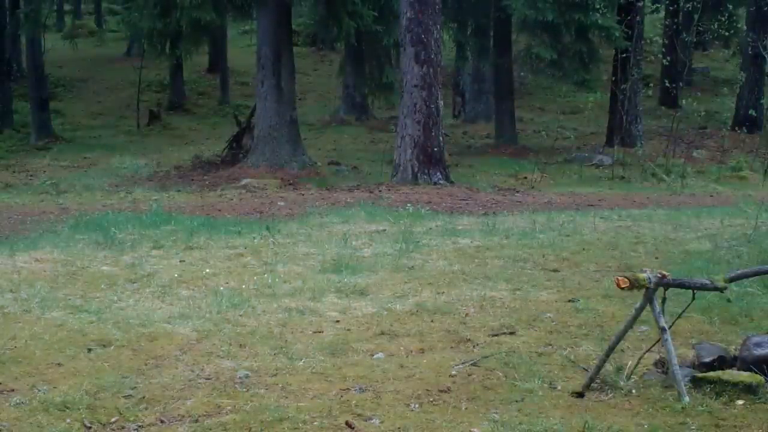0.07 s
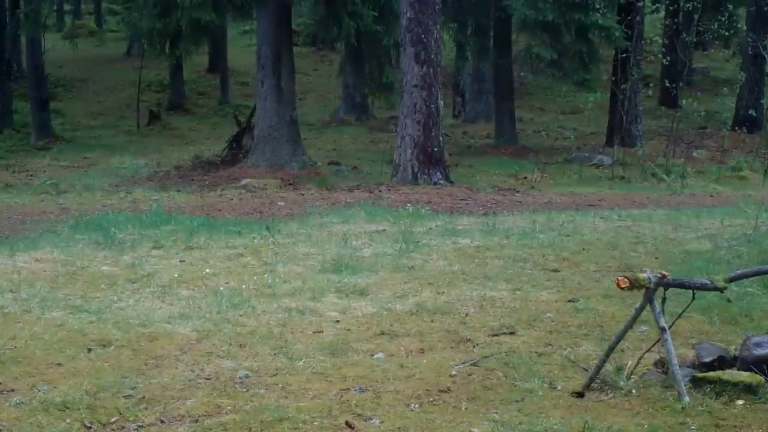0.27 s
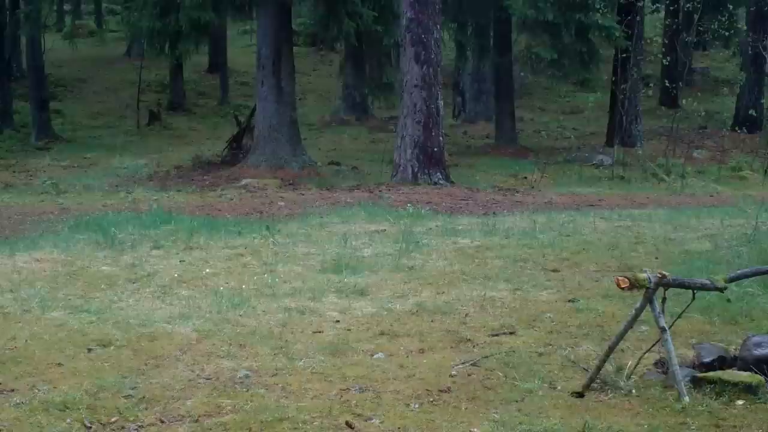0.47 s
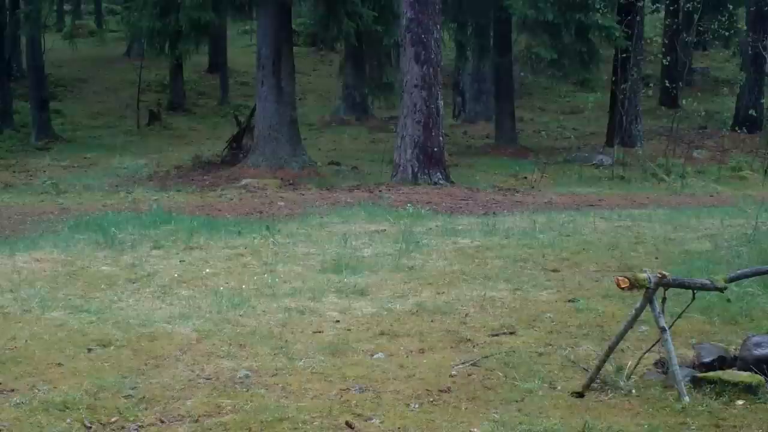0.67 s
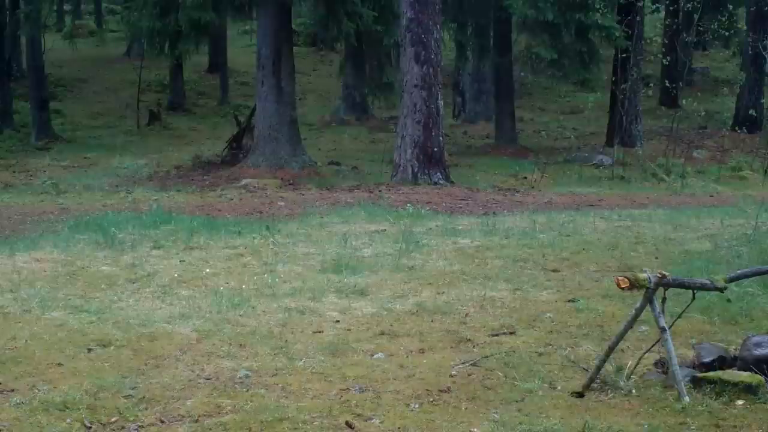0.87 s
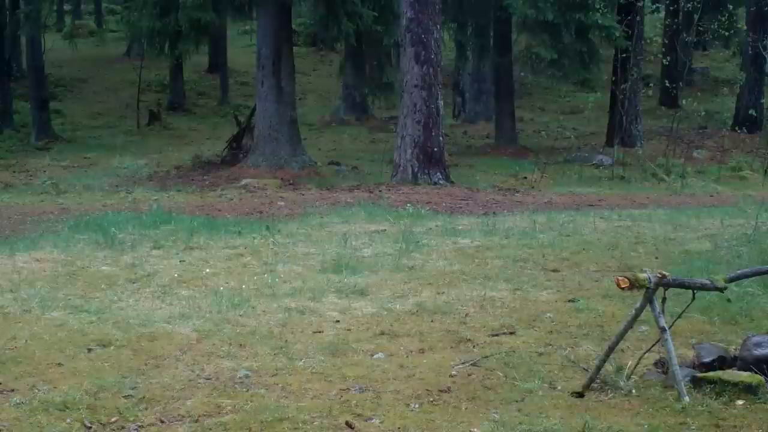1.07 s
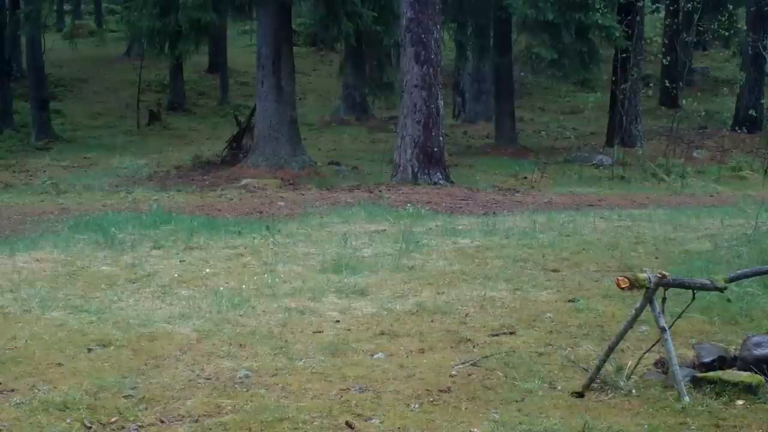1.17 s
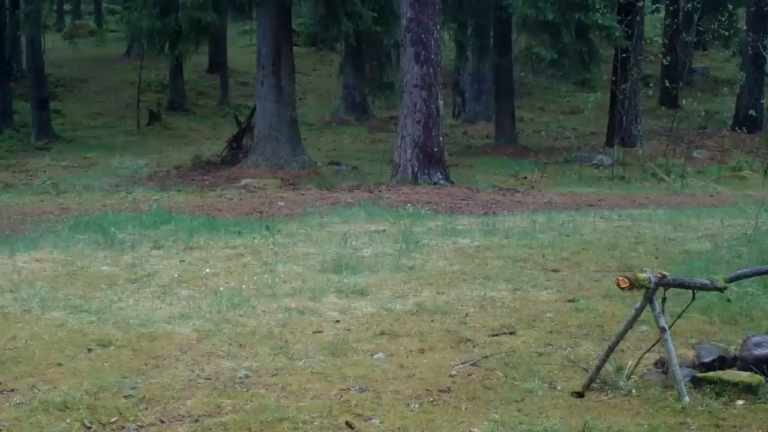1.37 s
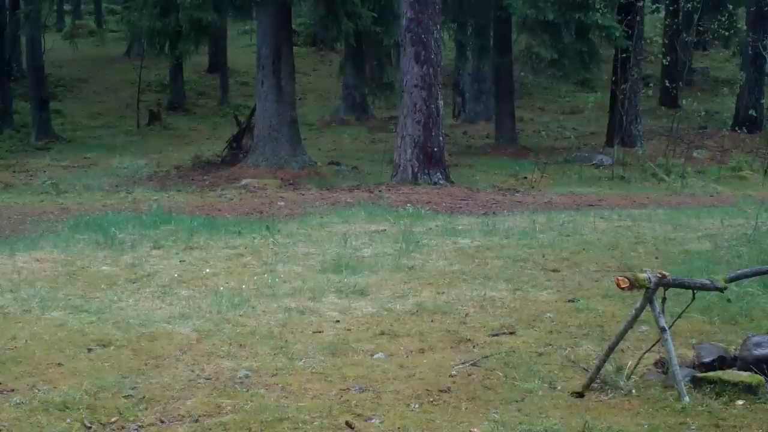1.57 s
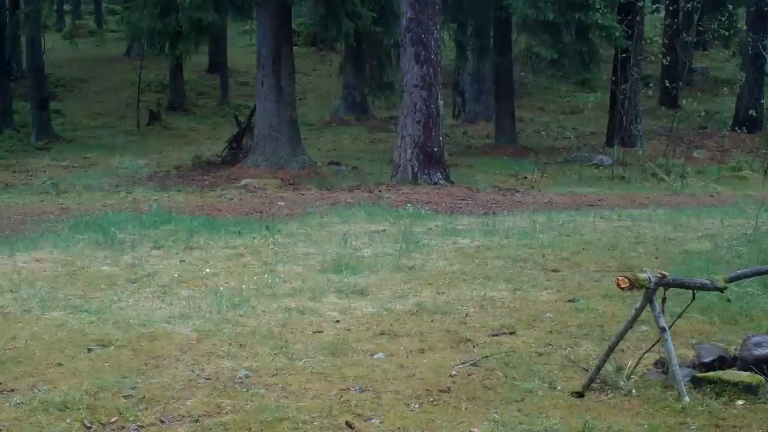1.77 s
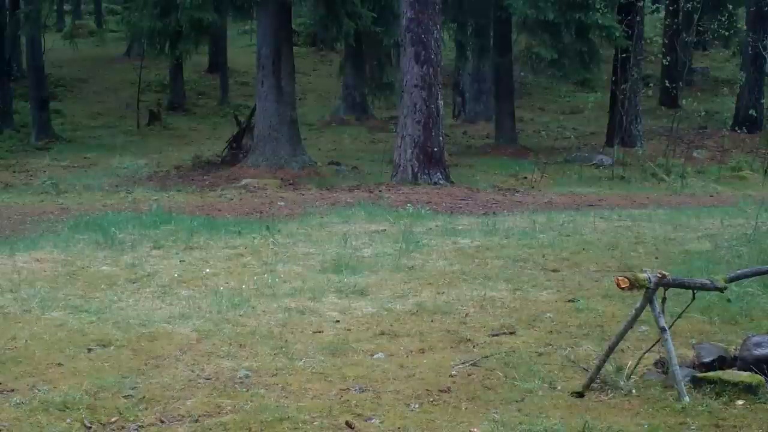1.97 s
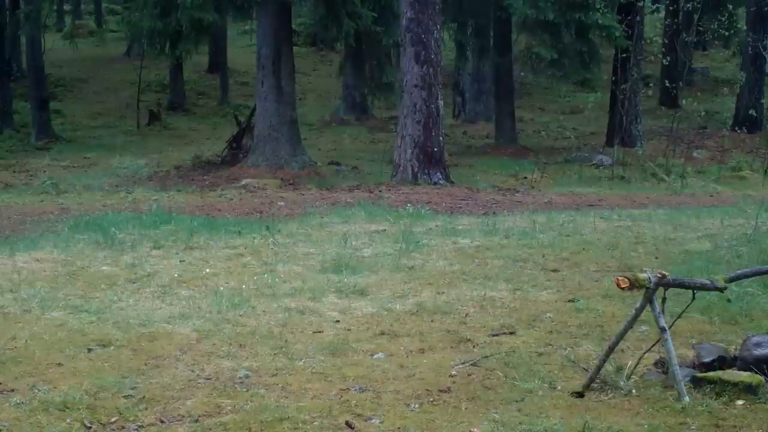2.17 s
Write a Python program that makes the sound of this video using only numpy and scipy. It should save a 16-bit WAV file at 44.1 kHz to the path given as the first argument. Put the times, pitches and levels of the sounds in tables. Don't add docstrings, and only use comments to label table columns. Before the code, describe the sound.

In a quiet forest clearing, arrows rattle and scrape into a leather tube in one dense burst, then shafts click against each other in small flurries; close, bright, slightly ringing small-microphone sound.

```python
import sys
import numpy as np
from scipy import signal
from scipy.fft import rfft, irfft
from scipy.io import wavfile
from scipy.ndimage import uniform_filter1d

SR = 44100
rng = np.random.default_rng(int(sys.argv[2]) if len(sys.argv) > 2 else 0)


def int16_out(signal):
    q = np.round(np.clip(np.atleast_2d(signal).T, -1, 1) * 32767)
    wavfile.write(sys.argv[1], SR, q.astype(np.int16))


def boost(x):
    u = np.asarray(x, float) / 20
    return 10 ** u


N = 97020

# frequency in Hz, level in dB, fade t60 in seconds.
SHAFT_MODES = [(1030, 1.5, 0.0054), (1495, -4.5, 0.0081), (1795, -5, 0.022), (2280, -4, 0.017),
               (2550, -14.5, 0.045), (3445, -13.5, 0.012), (4260, -26, 0.0059)]
# frequency in Hz, level in dB, fade t60 in seconds.
TUBE_MODES = [(131, -16, 0.046), (239.7, -8, 0.14), (370, 2.5, 0.048), (621, -1, 0.05), (832, -6, 0.052),
              (998, -11.5, 0.057), (1250, -6.5, 0.022)]
# start in seconds, level in dB, push in ms, frequency of the dent in Hz.
TUBE_BLOWS = [(0.009, -43, 0.71, 102), (0.035, -40.5, 0.56, 403), (0.058, -40.5, 0.77, 276),
              (0.089, -47, 0.97, 407), (0.149, -44, 0.49, 102), (0.275, -24, 1.06, 154),
              (0.29, -22.5, 1.24, 626), (0.313, -28.5, 0.53, 385), (0.321, -27.5, 0.26, 390),
              (0.334, -25, 0.68, 136), (0.349, -33, 1.4, 353), (0.362, -42, 0.61, 143),
              (0.383, -29, 1.1, 293), (0.391, -31.5, 1.4, 245), (0.427, -37, 0.83, 283),
              (0.451, -34, 0.66, 152), (0.477, -41, 0.86, 190), (0.524, -34.5, 0.7, 720),
              (0.552, -39, 0.63, 103), (0.613, -44.5, 0.36, 660), (1.546, -46, 1, 675)]
TAP_DB = -24.5


def filtered(x, order, hz, kind="low"):
    return signal.lfilter(*signal.butter(order, hz, kind, fs=SR), x)


def ring(x, modes):
    out = 0
    for hz, db, t60 in modes:
        radius = np.exp(-np.log(1000) / (t60 * SR))
        angle = 2 * np.pi * hz / SR
        poles = [1, -2 * radius * np.cos(angle), radius * radius]
        out = out + boost(db) * signal.lfilter([0, radius * np.sin(angle)], poles, x)
    return out


def grit(scatter_db):
    sizes = np.repeat(rng.exponential(size=N // 3 + 1), 3)[:N].clip(0, 4)
    x = rng.standard_normal(N) * boost(scatter_db * sizes)
    return x / x.std()


def walk(rate):
    k = int(SR / rate)
    x = uniform_filter1d(uniform_filter1d(rng.standard_normal(N), k), k)
    return x / x.std()


def drift(spectrum, db, rate):
    octave = np.log2(np.maximum(np.arange(N // 2 + 1) * SR / N, 10))
    out = 0
    for centre in np.arange(int(octave[0]), octave[-1] + 1):
        band = np.clip(1 - abs(octave - centre), 0, 1)
        out = out + irfft(spectrum * band, N) * boost(db * walk(rate))
    return out


def showers(table, db):
    scatter_db, patchy_db, tick_db = 2.5, 0.56, 0
    hold = 1.447
    tail_db, tail_stretch, tail_band_hz = -18.5, 3.05, [3500, 8700]
    t = np.arange(N) / SR
    air, tail, wood, ticks = np.zeros((4, N))
    for start, peak_db, t60, ring_db in table:
        age = np.maximum(t - start, 0) / max(t60, .002)
        gain = (t >= start) * boost(peak_db + db)
        air += gain * boost(-60 * age ** hold)
        tail += gain * boost(tail_db - 60 * age / tail_stretch)
        wood += gain * boost(ring_db - 60 * age)
        ticks[int(start * SR) + 16] = boost(tick_db)
    impacts = drift(rfft(grit(scatter_db)), patchy_db, 210) + ticks
    dull = filtered(grit(scatter_db), 2, tail_band_hz, "band")
    return impacts * air + dull * tail + 0.15 * ring(impacts * wood, SHAFT_MODES)


def forest():
    # frequency in Hz, level in dB per Hz.
    hush_spectrum = [(25, -62), (60, -71), (170, -85), (500, -87.5), (1200, -93), (2500, -104),
                     (7000, -112), (16000, -112)]
    points_hz, points_db = np.array(hush_spectrum).T
    log_hz = np.log(np.maximum(np.arange(N // 2 + 1) * SR / N, 10))
    colour = boost(np.interp(log_hz, np.log(points_hz), points_db)) * np.sqrt(SR / 2)
    hush = drift(rfft(rng.standard_normal(N)) * colour, 0.18, 16)
    return filtered(hush, 2, 22, "high")


def rub():
    # time in seconds, level in dB.
    strokes = [(0, -43), (0.099, -57), (.19, -46), (.235, -44), (.27, -34), (.3, -41), (.45, -31),
               (.53, -55), (.6, -70), (.7, -48), (.9, -62), (1.0, -43), (1.2, -90), (1.35, -71), (1.5, -74),
               (1.62, -41), (1.75, -69), (2.2, -64)]
    times, levels_db = np.array(strokes).T
    hiss = filtered(grit(4.3), 1, (3800, 9900), "band")
    stroke_db = np.interp(np.arange(N) / SR, times, levels_db)
    return hiss * boost(stroke_db - 15.5 + 2.2 * walk(45))


def catches():
    # start in seconds, level in dB, fade t60 in seconds, shaft ring in dB.
    slide_catches = [(0.006, -26, 0.033, -23), (0.0188, -21.5, 0.018, -1), (0.0455, -30, 0.011, -20),
                     (0.125, -31.5, 0.06, -20), (0.1325, -30, 0.012, -20), (0.1975, -18, 0.024, -18),
                     (0.206, -5.5, 0.029, -28), (0.214, -15, 0.044, -20), (0.2314, -21, 0.13, -2.5),
                     (0.2742, -5.5, 0.015, 1), (0.281, -5.5, 0.047, -16), (0.291, -6.5, 0.077, -18),
                     (0.2941, -8, 0.097, -4), (0.3204, -3, 0.079, -24), (0.3374, -6.5, 0.12, -25),
                     (0.3494, -3.5, 0.057, -33), (0.357, -16, 0.093, -29), (0.3826, -6, 0.17, -21),
                     (0.396, -8, 0.068, -26), (0.4143, -10.5, 0.054, -31), (0.4245, -12.5, 0.14, -4),
                     (0.4469, -3.5, 0.045, -34), (0.4776, -13.5, 0.13, -3), (0.4975, -14, 0.044, -17),
                     (0.5094, -14.5, 0.12, -13), (0.5318, -5.5, 0.011, 0), (0.5484, -25.5, 0.06, -4),
                     (0.567, -23.5, 0.056, -27), (0.554, -23.5, 0.03, -20), (0.6113, -14, 0.014, -10),
                     (0.618, -18, 0.031, -5)]
    return showers(slide_catches, -26.5)


def thuds():
    thud_db, dent_t60_s = -3, 0.059
    out = 0
    chance = rng.standard_normal((len(TUBE_BLOWS), len(TUBE_MODES)))
    for (start, db, push_ms, dent_hz), luck in zip(TUBE_BLOWS, chance):
        n = int(max(push_ms, .3) * SR / 1000)
        i = int(start * SR)
        push = np.zeros(N)
        push[i:i + n] = np.sign(luck[0]) * boost(db + thud_db) * np.hanning(n) / n
        modes = [(dent_hz, 4, dent_t60_s)]
        for (hz, mode_db, t60), e in zip(TUBE_MODES, luck):
            modes.append((hz * (1 + 0.086 * np.clip(e, -1, 1)), mode_db + 3.3 * e, t60))
        out = out + ring(push, modes)
    return filtered(out, 2, 105, "high")


def rumble():
    rumble_db, rumble_t60_s = -13, 0.073
    t = np.arange(N) / SR
    shake = np.zeros(N)
    for start, db, _, _ in TUBE_BLOWS:
        fade_db = -60 * np.maximum(t - start, 0) / rumble_t60_s
        shake += (t >= start) * boost(db + rumble_db + fade_db)
    damped = [(hz, db, 0.34 * t60) for hz, db, t60 in TUBE_MODES]
    return ring(shake * grit(3.7) * 0.12, damped)


def snaps():
    # start
    # in seconds, level in dB.
    brief_contacts = [(0.2061, -9.5), (0.2177, -22.5), (0.2741, -13), (0.2808, -13), (0.2928, -5),
                      (0.2961, -9.5), (0.2983, -9), (0.3027, -16), (0.3036, -10), (0.307, -16), (0.3092, -22),
                      (0.311, -22), (0.316, -21), (0.321, -11), (0.3235, -12), (0.3265, -24), (0.332, -11),
                      (0.335, -18), (0.3354, -12), (0.3372, -12), (0.342, -17), (0.3445, -14), (0.3513, -3),
                      (0.3536, -13), (0.357, -10), (0.361, -17), (0.3647, -21), (0.3668, -19), (0.37, -23),
                      (0.3724, -37), (0.3824, -18), (0.3844, -24), (0.387, -19), (0.3907, -19), (0.395, -7.5),
                      (0.4016, -15), (0.406, -17), (0.4107, -27), (0.412, -29), (0.4138, -14), (0.4182, -12.5),
                      (0.422, -23), (0.4254, -15), (0.43, -17), (0.44, -15.5), (0.4487, -5), (0.4516, -16),
                      (0.454, -14), (0.46, -15), (0.4661, -33), (0.4772, -26), (0.4807, -23), (0.4841, -21),
                      (0.4869, -22), (0.4985, -17), (0.5108, -17), (0.5254, -19), (0.5344, -13),
                      (0.8161, -33.5), (0.9511, -15.5), (0.9536, -25.5), (0.9544, -23), (0.959, -39),
                  (0.9618, -36), (1.0648, -45), (1.0774, -51), (1.205, -40), (1.2679, -18.5), (1.2686, -27),
                  (1.2738, -46), (1.28, -38), (1.2892, -30), (1.3016, -17), (1.3034, -24), (1.3061, -19),
                  (1.3182, -30), (1.3214, -29), (1.3233, -34), (1.3314, -29), (1.3346, -33), (1.3417, -32),
                  (1.3656, -38), (1.3707, -25), (1.3963, -26.5), (1.3994, -37), (1.4492, -38),
                  (1.5424, -33), (1.5446, -28), (1.548, -28), (1.5558, -11), (1.559, -37), (1.563, -35),
                  (1.565, -31), (1.5769, -33), (1.5981, -17.5), (1.5997, -42), (1.6068, -32), (1.6134, -29),
                  (1.626, -19.5), (1.6327, -43), (1.6358, -31), (1.6397, -35), (1.6424, -28), (1.656, -31),
                  (1.657, -35), (1.6597, -42), (1.8042, -34.5), (1.845, -40), (2.072, -38.5)]
    snap_db, fade_db, wood_db = -3.5, 11.5, -27
    table = np.array(brief_contacts)
    bursts = rng.standard_normal((len(table), 80)) * boost(-fade_db * np.linspace(0, 1, num=80))
    bursts = filtered(bursts, 1, (5540, 12700), "band")
    heard = signal.lfilter(*signal.iirpeak(7400, 3, fs=SR), bursts)
    bursts /= np.linalg.norm(heard, axis=1, keepdims=True)
    x = np.zeros(N)
    for (start, db), burst in zip(table, bursts):
        i = int(start * SR) - 10
        x[i:i + len(burst)] += boost(db + snap_db) * burst
    return x + boost(wood_db) * ring(x, SHAFT_MODES)


def rings():
    # start in seconds, frequency in Hz.
    tones = [
        (.952, 1860),
        (1.332, 2050),
        (1.195, 2600),
        (1.598, 6050),
        (.478, 620),
        (1.063, 2500),
        (.2064, 6900),
        (1.525, 10000),
    ]
    tones_db = [-44, -43, -45, -30, -42.5, -44, -34, -58]
    tones_t60 = [0.059, 0.026, 0.0074, 0.0072, 0.14, 0.014, 0.016, 0.033]
    out = np.zeros(N)
    for (start, hz), db, t60 in zip(tones, tones_db, tones_t60):
        strike = np.zeros(N)
        strike[int(start * SR)] = 1
        out += ring(strike, [(hz, db, t60)])
    return out


def taps():
    # start in seconds, level in dB, fade t60 in seconds, shaft ring in dB.
    shaft_taps = [(0.8148, -40, 0.025, -12), (0.95, -10.5, 0.037, -1), (1.0626, -16, 0.016, -1),
                  (1.0774, -22, 0.02, -25), (1.09, -29, 0.028, -12), (1.1935, -31.5, 0.03, -12),
                  (1.2044, -32, 0.015, -5), (1.2671, -10, 0.034, -7.5), (1.288, -10.5, 0.014, -11),
                  (1.301, -9, 0.023, -12), (1.3056, -12.5, 0.025, -24), (1.319, -14, 0.014, -9),
                  (1.3308, -16.5, 0.015, -5), (1.3404, -30, 0.016, -7), (1.3656, -22, 0.01, -9),
                  (1.3707, -20, 0.015, -19), (1.3957, -18.5, 0.0097, 4), (1.4489, -23.5, 0.013, 1),
                  (1.522, -32, 0.12, -6), (1.5404, -21, 0.054, -14), (1.5477, -32, 0.037, -23),
                  (1.5757, -33, 0.027, 7), (1.5974, -9, 0.026, -33), (1.6257, -10, 0.019, -2),
                  (1.642, -18, 0.0073, 2), (1.6552, -22.5, 0.03, -19), (1.6776, -26.5, 0.034, -20),
                  (1.8042, -20, 0.0073, -14), (1.8438, -24, 0.01, -21), (2.0712, -29, 0.015, -8)]
    return filtered(showers(shaft_taps, TAP_DB), 1, 9300)


def knock():
    # start in seconds, level in dB, shaft ring in dB.
    hard_blow = (1.5551, 0, -12)
    # start in seconds, level in dB, fade t60 in seconds, shaft ring in dB.
    rattle = [
        (1.5558, -10, 0.039, -4),
    ]
    # frequency in Hz, level in dB, fade t60 in seconds.
    knock_modes = [(720, -7.5, 0.058), (880, 5.5, 0.014), (1060, -2, 0.012), (1830, 3, 0.0071),
                   (3840, -3, 0.019), (4640, -3.5, 0.0094)]
    squeak_hz, rise_s = 6000, 0.00013
    start, db, ring_db = hard_blow
    age = np.arange(N) / SR - start
    blow = np.zeros(N)
    blow[int(start * SR)] = boost(db)
    swell = np.exp(-.5 * (age / rise_s) ** 2)
    squeak = boost(db - 16.5) * swell * np.cos(2 * np.pi * squeak_hz * age)
    body = 0.13 * boost(ring_db) * ring(blow, knock_modes)
    return 1.05 * blow + squeak + body + showers(rattle, TAP_DB)


def scene():
    bright = rub() + catches() + snaps() + taps() + knock()
    bright = filtered(bright, 1, 7830)
    bright = filtered(bright, 1, 2400, "high")
    return (forest() + bright + thuds() + rumble() + rings())[None]


def low_pass(x):
    return signal.sosfilt(signal.butter(12, 17150, fs=SR, output="sos"), x)


def record(dry):
    # frequency in Hz, width in Hz, level in dB.
    port = [(7240, 605, 16), (7120, 1420, 12), (9650, 520, -11)]
    x = dry
    for hz, width, db in port:
        x = x + boost(db) * signal.lfilter(*signal.iirpeak(hz, hz / width, fs=SR), dry)
    ceiling = 1.63
    x = .86 * ceiling * np.tanh(x / .86 / ceiling)
    x = signal.sosfilt(signal.ellip(6, .2, 18, 15800, fs=SR, output="sos"), x)
    x = signal.sosfilt(signal.ellip(10, .2, 60, 17080, fs=SR, output="sos"), x)
    return low_pass(x)


dry = scene()
out = record(dry)
int16_out(out)
```